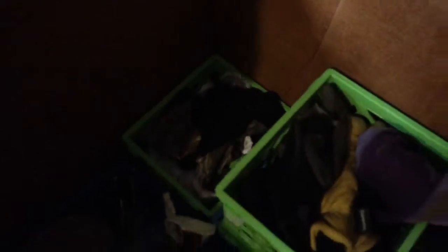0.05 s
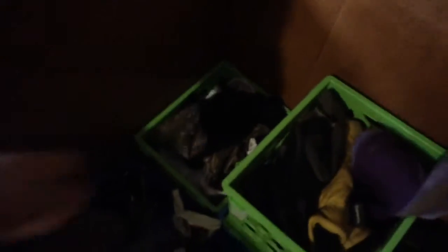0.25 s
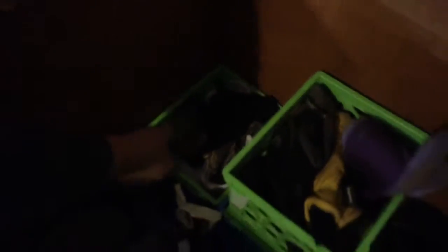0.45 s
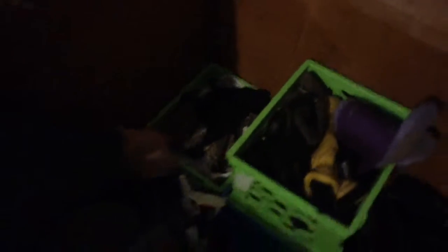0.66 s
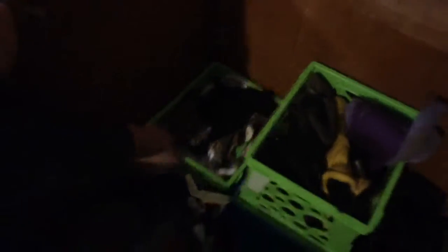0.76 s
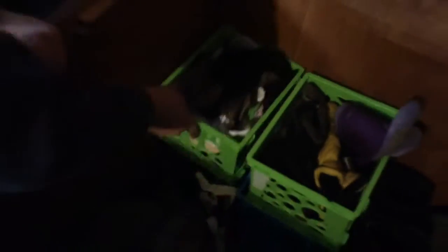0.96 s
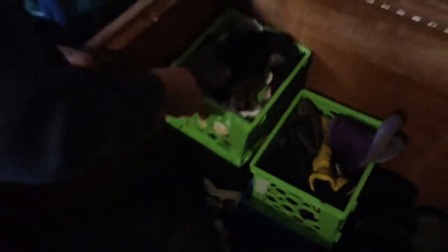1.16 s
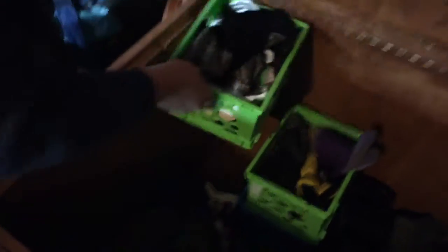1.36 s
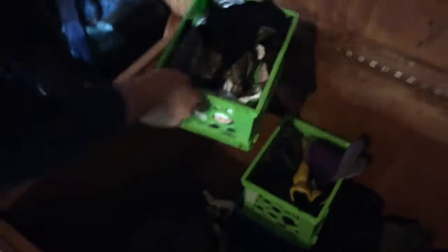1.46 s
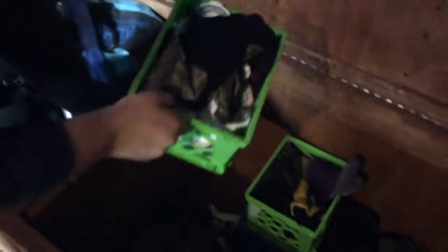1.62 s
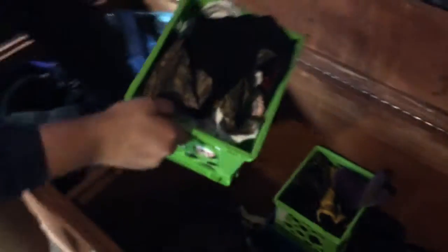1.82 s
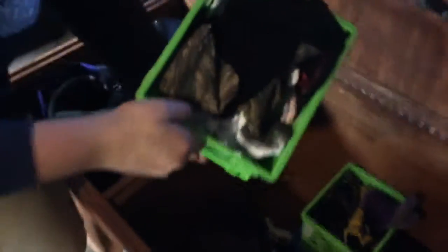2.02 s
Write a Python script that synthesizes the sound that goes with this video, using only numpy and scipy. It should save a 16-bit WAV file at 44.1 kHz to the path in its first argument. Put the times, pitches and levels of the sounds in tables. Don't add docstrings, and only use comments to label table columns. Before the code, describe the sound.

A plastic crate scrapes and knocks hard across wooden boards as it is dragged out and lifted

```python
import sys
import numpy as np
from scipy import signal
from scipy.fft import rfft, irfft
from scipy.io import wavfile
from scipy.ndimage import uniform_filter1d

SR = 44100
rng = np.random.default_rng(int(sys.argv[2]) if len(sys.argv) > 2 else 0)


def decibels_to_gain(level_db):
    exponent = np.asarray(level_db, float) / 20
    return 10 ** exponent


def wav_out(sig):
    wavfile.write(sys.argv[1], SR, np.round(np.clip(np.atleast_2d(sig).T, -1, 1) * 32767).astype(np.int16))


N = 91948
T = np.arange(N) / SR


def unit(x):
    return x / np.sqrt(np.mean(x ** 2))


def ring(x, peaks):
    out = 0
    for k, (hz, width_hz, db) in enumerate(peaks):
        b, a = signal.iirpeak(hz, hz / width_hz, fs=SR)
        out = out + (-1) ** k * decibels_to_gain(db) * signal.lfilter(b, a, x)
    return out


def colour(x, points):
    hz, db = np.array(points).T
    bin_hz = np.arange(N // 2 + 1) * SR / N
    gain_db = np.interp(np.log(bin_hz + 1), np.log(hz), db)
    return irfft(rfft(x) * decibels_to_gain(gain_db), N)


def walk(rate_hz):
    hold = int(SR / rate_hz)
    levels = rng.standard_normal(N // hold + 1)
    return unit(uniform_filter1d(levels[np.arange(N) // hold], hold // 2))


def swell(start_s, length_s, place=0.48):
    peak_s = start_s + np.clip(place, .02, .98) * length_s
    ramp = np.interp(T, [start_s, peak_s, start_s + length_s], [0, 1, 0])
    return np.sin(np.pi / 2 * ramp) ** 2


def decay(at_s, t60_s):
    return (T >= at_s) * 10 ** (-3 * np.maximum(T - at_s, 0) / t60_s)


# frequency in Hz, level in dB per Hz.
AIR_SPECTRUM = [(15, -33.5), (45, 2.5), (313, -6.5), (457, -14), (582, -4), (1170, -14.5), (2010, -12.5),
                (2300, -16.5), (15500, -27)]


def room_air():
    level_db = -58 + 0.56 * walk(31)
    return decibels_to_gain(level_db) * unit(colour(rng.standard_normal(N), AIR_SPECTRUM))


def lean():
    sway = ring(rng.standard_normal(N), [(104, 20, 16), (45, 28, -3)])
    return decibels_to_gain(-50) * swell(0.051, 0.68) * unit(sway)


# start in s, length in s, centre in Hz, width in Hz, level in dB.
RUBS = [
    (0.11, 0.075, 1040, 80, -42),
    (0.17, 0.042, 1050, 70, -42),
    (0.086, 0.077, 2200, 570, -50.5),
    (0.17, 0.039, 2650, 670, -49),
    (0.14, 0.099, 800, 84, -43.5),
    (0.238, 0.055, 440, 90, -59.5),
    (0.23, 0.35, 2020, 1160, -51),
    (.64, 0.17, 400, 200, -43.5),
    (1, 0.04, 9700, 130, -30),
]


def rubs():
    out = 0
    for start_s, length_s, hz, width_hz, db in RUBS:
        band = [(hz, width_hz, 0)]
        noise = ring(ring(rng.standard_normal(N), band), band)
        out = out + decibels_to_gain(db) * swell(start_s, length_s) * unit(noise)
    return out


def grip_creak():
    hz = 800 * (1 + .025 * walk(90))
    return decibels_to_gain(-32) * swell(.116, .05, .45) * np.sin(2 * np.pi * np.cumsum(hz) / SR)


# time in s, peak in dB, pitch in Hz, t60 in s.
THUDS = [(0.099, -45, 139, .03), (0.116, -39.5, 229, .04), (0.154, -32, 125, 0.028),
         (0.186, -29.5, 113.5, 0.088), (0.257, -35.5, 105, 0.044), (.444, -34, 243, 0.03),
         (0.636, -26, 214, 0.018), (0.675, -27, 132, 0.017), (0.689, -34.5, 139, 0.046),
         (0.723, -33, 263, 0.022), (.75, -32.5, 148, 0.019), (0.8063, -4.5, 182.4, 0.024),
         (0.8163, -10, 112, 0.017), (0.834, -10, 213, 0.026), (0.86, -12, 131, 0.0088),
         (0.9251, -6, 180, 0.022), (.9395, 2.5, 190, .045), (0.981, -4.5, 170, 0.024),
         (1.007, -14.5, 147, .028), (1.059, -19, 180, 0.02), (1.125, -19, 190, 0.016),
         (1.234, -17, 173, 0.042), (1.3, -21.5, 207, 0.025), (1.315, -29.5, 167.7, 0.12),
         (1.389, -47.5, 173, 0.21), (1.471, -49, 107.6, .13), (1.6, -54, 80, 0.1), (1.641, -51, 160, 0.043),
         (1.691, -35, 165, 0.025), (1.71, -41.5, 182, 0.039)]
# frequency ratio, level in dB.
THUD_PARTIALS = [(1, -3), (2.05, -18), (2.85, -22.5)]
THUD_RISE_S = 0.0012
THUD_SAG_S = 0.21


def thuds():
    out = 0
    for at_s, db, hz, t60_s in THUDS:
        u = np.maximum(T - at_s, 0)
        sag = 1 - np.minimum(decibels_to_gain(db) * u / THUD_SAG_S, 1) / 4
        wave = 0
        for ratio, share_db in THUD_PARTIALS:
            wave = wave + decibels_to_gain(share_db) * np.sin(2 * np.pi * ratio * hz * u * sag)
        rise = 1 - np.exp(-u / THUD_RISE_S)
        choke = 10 ** (-3 * (u / t60_s) ** 3)
        out = out + decibels_to_gain(db) * rise * choke * wave
    return out


# time in s, peak in dB, pitch in Hz, t60 in s.
PINGS = [(0.188, -48, 45, 0.5), (.559, -25, 430, .04), (0.5685, -19, 6270, 0.025), (.569, -23, 620, 0.03),
         (.5712, -21, 1900, 0.04), (.578, -22, 420, 0.035), (.598, -28, 560, .04), (.6, -28, 1050, .03),
         (0.6405, -23, 1094, 0.04), (.65, -29, 430, .03), (.703, -40, 3500, .01), (.704, -38, 1500, .015),
         (.715, -33, 850, .02), (.716, -32, 1300, .025), (.801, -26, 2900, 0.016), (.806, -19, 500, .04),
         (.8398, -13, 4900, 0.02), (.849, -15, 330, .02), (.867, -18, 540, .02),
         (0.9208, -13.5, 6900, 0.025), (0.9332, -6, 2242, 0.021), (.94, -7, 342, .07),
         (.9415, -11.5, 5086, 0.019), (.947, -7, 1015, 0.031), (.958, -13, 380, .03), (.9725, -9, 500, .03),
         (0.983, -16, 2900, 0.013), (.993, -14, 1300, .025), (.995, -17.5, 3900, 0.019),
         (1.022, -18, 520, .04), (1.056, -21, 450, .03), (1.084, -21, 550, .025), (1.128, -25, 1300, .02),
         (1.51, -50.5, 1458, 0.081), (1.731, -53, 1900, .05)]


def pings():
    out = 0
    for at_s, db, hz, t60_s in PINGS:
        u = np.maximum(T - at_s, 0)
        mode = np.sin(2 * np.pi * hz * u) + .6 * np.sin(2 * np.pi * 1.11 * hz * u)
        out = out + decibels_to_gain(db) * 10 ** (-3 * u / t60_s) * mode
    return out


# start in s, length in s, level in dB.
SWEEPS = [
    (1.117, 0.13, -40),
    (1.2, 0.023, -50),
    (1.481, 0.28, -53),
    (0.43, 0.42, -58),
]


def sweep_force():
    return sum(decibels_to_gain(db) * swell(start_s, length_s, 0.4) ** 0.75 for start_s, length_s, db in SWEEPS)


# start in s, length in s, crate in dB, hiss in dB, peak place 0-1.
SCUFFS = [(0.094, 0.075, -45, -55.5, 0.55), (0.148, 0.069, -41.5, -55, 0.6), (0.303, .2, -63, -59.5, 0.46),
          (0.433, 0.094, -51.5, -54, 0.52), (0.546, 0.031, -28.5, -23.5, 0.7),
          (0.557, 0.06, -29.5, -26, 0.55), (0.592, 0.085, -36, -32.5, 0.33), (0.631, 0.024, -31, -62, 0.6),
          (0.659, 0.32, -54, -55.5, 0), (0.836, 0.016, -46, -15.5, 0.47), (0.998, 0.056, -23, -25, 0.05),
          (1.142, 0.048, -44, -52, 0.5), (1.298, 0.056, -31.5, -70, 0.3), (1.323, 0.43, -65.5, -64.5, 0.17),
          (1.465, 0.35, -57, -61, 0.47), (1.829, 0.079, -55, -58, 0.4), (2.048, 0.078, -64, -56, .6)]


def scuff_forces():
    wall, hiss = 0, 0
    for start_s, length_s, crate_db, hiss_db, place in SCUFFS:
        shape = swell(start_s, length_s, place) ** .65
        wall = wall + decibels_to_gain(crate_db) * shape
        hiss = hiss + decibels_to_gain(hiss_db) * shape
    return wall, hiss


# time in s, crate in dB, hiss in dB, t60 in s.
KNOCKS = [(0.185, -49, -45, 0.087), (0.5699, -18, -31, 0.011), (0.644, -46, -65, 0.0043),
          (0.704, -59, -47, 0.0072), (0.7149, -32, -49, 0.024), (0.7675, -29, -28.5, 0.0067),
          (0.7985, -34.5, -54, 0.083), (0.841, -18, -17, 0.0095), (.851, -20.5, -25, 0.0067),
          (0.868, -12, -29, 0.02), (.879, -23, -34, 0.019), (0.9216, -9.5, -11, 0.019),
          (0.9298, -5.5, -25.5, 0.028), (.941, -4.5, -19, 0.012), (0.951, -12.5, -39, 0.0064),
          (0.972, -22, -41, 0.066), (0.978, -15, -28.5, 0.034), (0.9846, -17.5, -21.5, 0.0088),
          (0.9926, -13.5, -20.5, 0.018), (1.1273, -49, -59, 0.053), (1.236, -26, -31.5, 0.063),
          (1.3019, -57, -64, 0.12), (1.328, -32, -60, 0.02), (1.598, -50, -40.5, 0.0063),
          (1.719, -47, -73, 0.012), (1.762, -46, -64, 0.014), (1.847, -43, -46.5, 0.052),
          (1.924, -59, -56, 0.025)]


def knock_forces():
    wall, hiss = 0, 0
    for at_s, crate_db, hiss_db, t60_s in KNOCKS:
        shape = decay(at_s, t60_s)
        wall = wall + decibels_to_gain(crate_db) * shape
        hiss = hiss + decibels_to_gain(hiss_db) * shape
    return wall, hiss


# time in s, pressure in dB, hiss share in dB, panel share in dB.
DRAG = [(0.755, -43, 6.5, 18), (0.798, -35, -6.5, -24), (.83, -24.5, -3, -1), (0.857, -25, -3, 6.5),
        (.89, -26, -3.5, -7), (.915, -27.5, -5, -10), (0.945, -24, -9, -6), (.968, -24, -9, -6),
        (0.993, -27.5, -15, 13.5), (1.025, -29, -28, -3), (1.06, -26.5, -6.5, -1.5),
        (1.1, -27.5, -11.5, -7), (1.141, -25.5, -17.5, 1.5), (1.18, -29.5, -6, -5),
        (1.225, -29.5, -7, -3.5), (1.275, -34.5, -5.5, -8.5), (1.305, -28.5, -10, 0.5),
        (1.334, -35.5, -9, 2)]


def drag_forces():
    s, db, base_db, panel_db = np.array(DRAG).T
    on = np.clip(np.minimum(T - s[0], s[-1] + .01 - T) / .012, 0, 1)
    return [on * decibels_to_gain(np.interp(T, s, db + share_db)) for share_db in (0, base_db, panel_db)]


def grit(per_s, spread_db):
    chance, sign, size = rng.random((3, N))
    clicks = (chance < per_s / SR) * np.sign(sign - .5) * decibels_to_gain(-spread_db * np.log(size + 1e-9))
    stutter_db = 1.4 * walk(130)
    return unit(clicks * decibels_to_gain(stutter_db))


def walls(x, peaks):
    out = 0
    for k, peak in enumerate(peaks):
        flicker_db = 2.4 * walk(50)
        own_grit = np.roll(x, k * (3 * k + 5)) * decibels_to_gain(flicker_db)
        out = out + (-1) ** k * ring(own_grit, [peak])
    return signal.lfilter(*signal.butter(3, 340, "high", fs=SR), out)


def rub(force, grain, sound, shape):
    g = grit(*grain)
    return sound(g * force, shape) / np.std(sound(g, shape))


# clicks per s, size spread in dB.
GRAINS = [(6000, 2.0), (12000, 1.3), (9000, 1.6), (1200, 2)]
# frequency in Hz, width in Hz, level in dB.
WALL_MODES = [(430, 255, 4), (534.4, 23, 9.5), (667, 83, -2), (794, 230, -9), (990.7, 25, 4.5),
              (1235, 247, -0.5), (1556, 180, -3.5), (1913, 260, 1), (2070, 870, -12), (2882, 284, -11),
              (3900, 900, -20)]
# frequency in Hz, level in dB per Hz.
FINE_HISS = [(300, -25), (1000, -1), (3000, -3), (6000, -4.5), (9000, -5), (12000, -7.5), (15000, -11.5)]
# frequency in Hz, level in dB per Hz.
BASE_HISS = [(300, -30), (1000, -8), (3000, 0), (6000, -2), (8500, -4), (11000, -15), (15000, -28)]
# frequency in Hz, width in Hz, level in dB.
PANEL_MODES = [(64.4, 36, -21.5), (115, 43, -6.5), (185, 58, -5), (298, 110, -10)]


def crate():
    drag_wall, drag_base, panel = drag_forces()
    scuff_wall, scuff_hiss = scuff_forces()
    knock_wall, knock_hiss = knock_forces()
    wall_grain, fine_grain, base_grain, panel_grain = GRAINS
    out = rub(drag_wall + scuff_wall + knock_wall, wall_grain, walls, WALL_MODES)
    out = out + rub(scuff_hiss + knock_hiss, fine_grain, colour, FINE_HISS)
    out = out + rub(drag_base + sweep_force(), base_grain, colour, BASE_HISS)
    return out + rub(panel, panel_grain, ring, PANEL_MODES)


def trunk_echo(near):
    t60_s, cut_hz, level_db = 0.49, 1990, -25.5
    tail = rng.standard_normal(SR // 2) * 10 ** (-3 * T[:SR // 2] / t60_s)
    tail = signal.lfilter(*signal.butter(1, cut_hz, fs=SR), tail)
    tail = tail / np.sqrt(np.sum(tail ** 2))
    return decibels_to_gain(level_db) * signal.fftconvolve(near, tail)[:N]


def scene():
    near = lean() + rubs() + grip_creak() + thuds() + pings() + crate()
    return np.tile(near + trunk_echo(near) + room_air(), (2, 1))


def roll_off(x):
    return signal.sosfilt(signal.butter(12, 16310, fs=SR, output="sos"), x)


def record(dry):
    top_cut = signal.ellip(8, .2, 60, 15100, fs=SR, output="sos")
    mix = np.clip(signal.sosfilt(top_cut, dry), -1, 1)
    return roll_off(mix)


dry = scene()
out = record(dry)
wav_out(out)
```